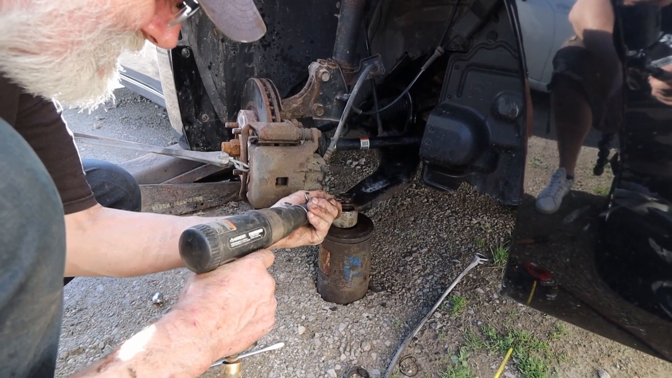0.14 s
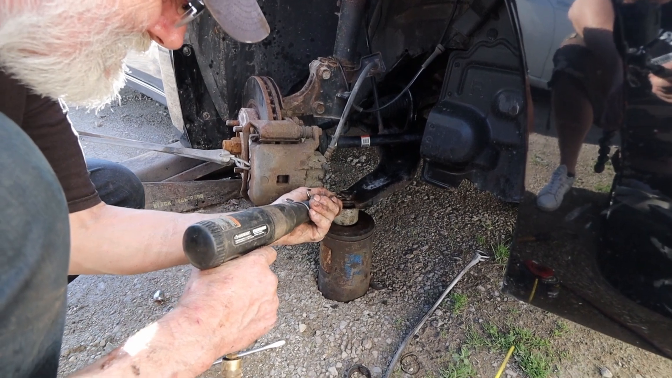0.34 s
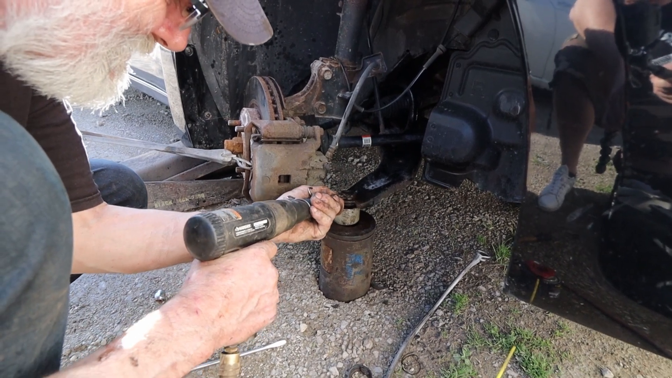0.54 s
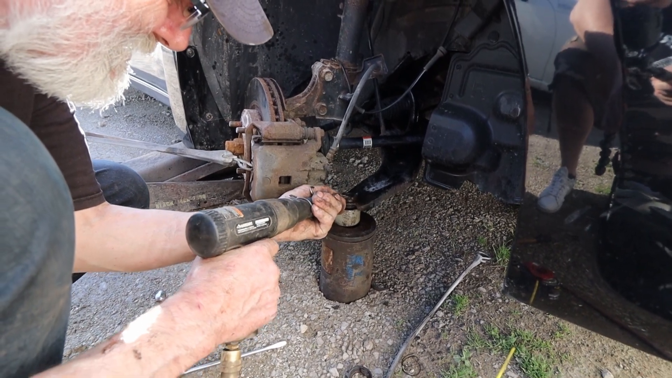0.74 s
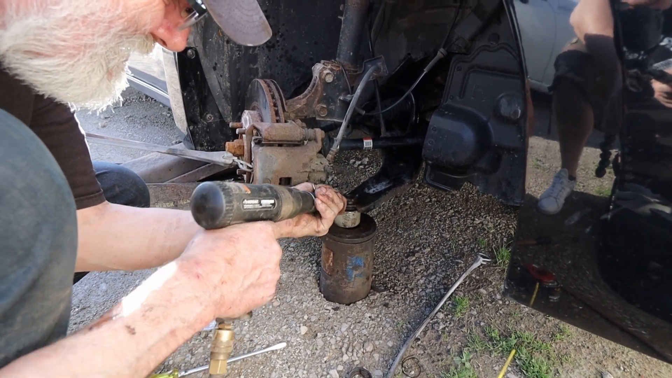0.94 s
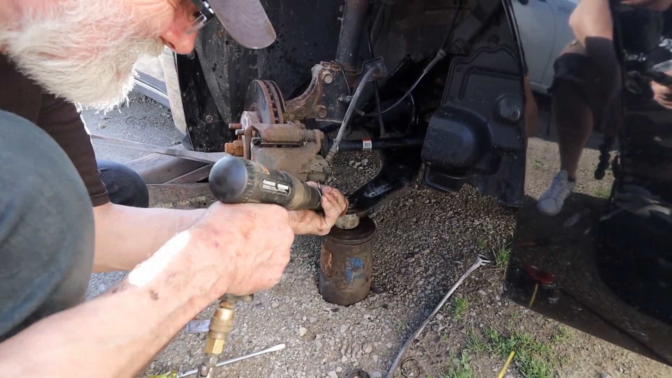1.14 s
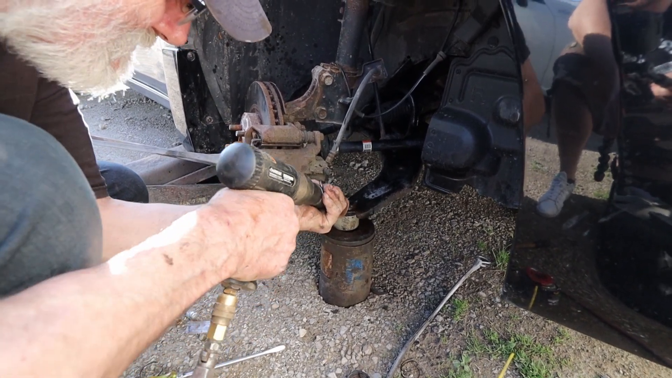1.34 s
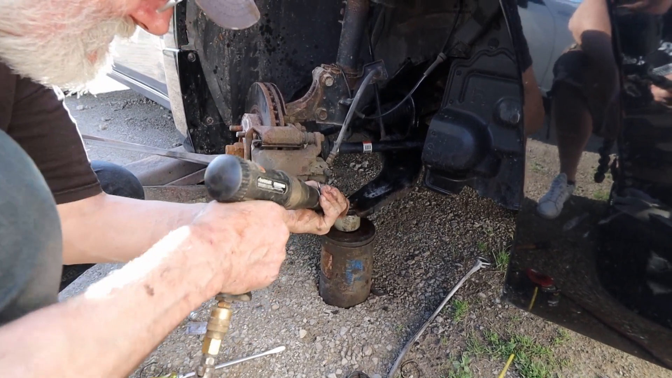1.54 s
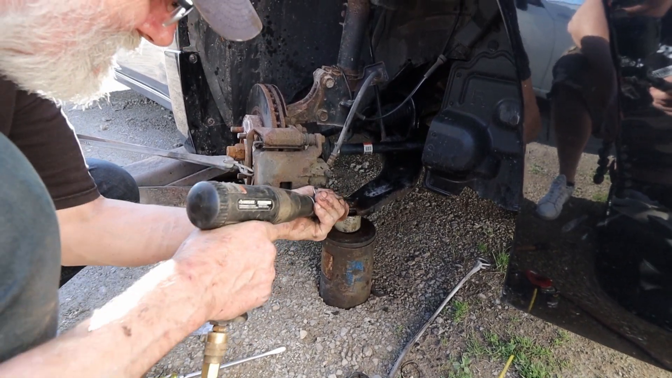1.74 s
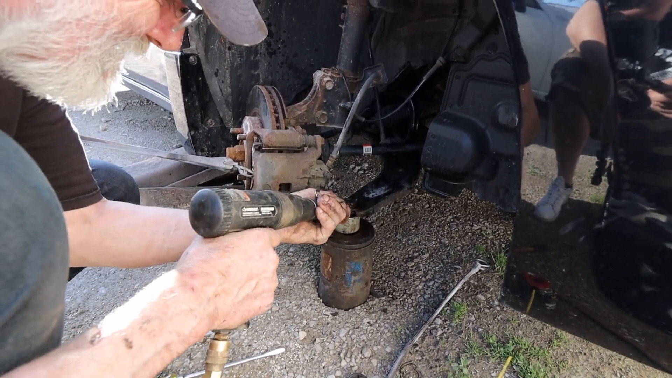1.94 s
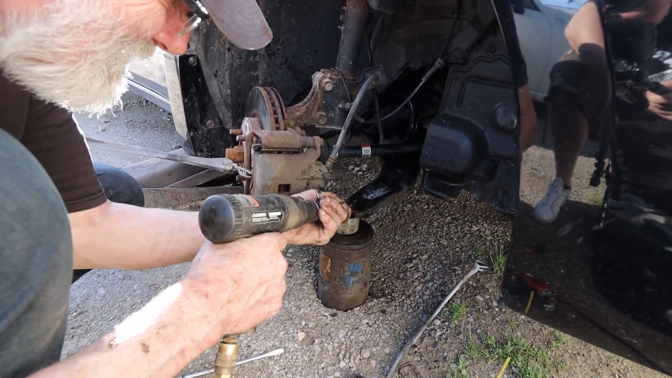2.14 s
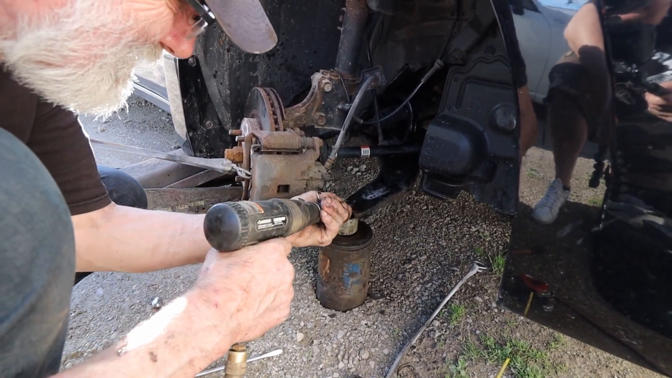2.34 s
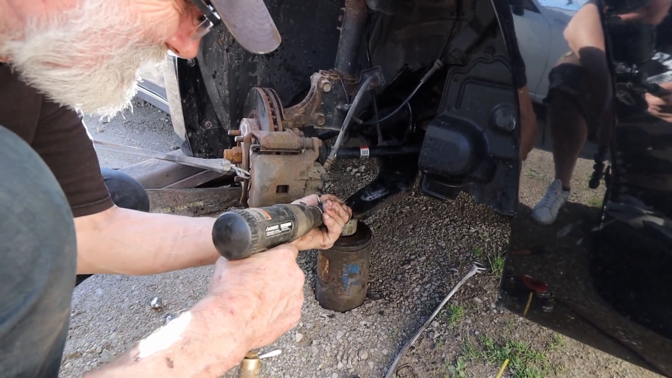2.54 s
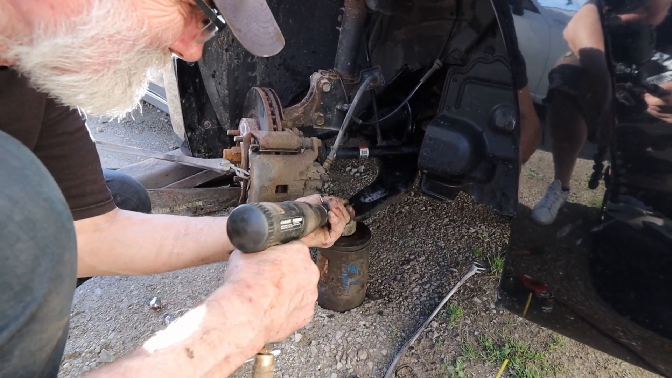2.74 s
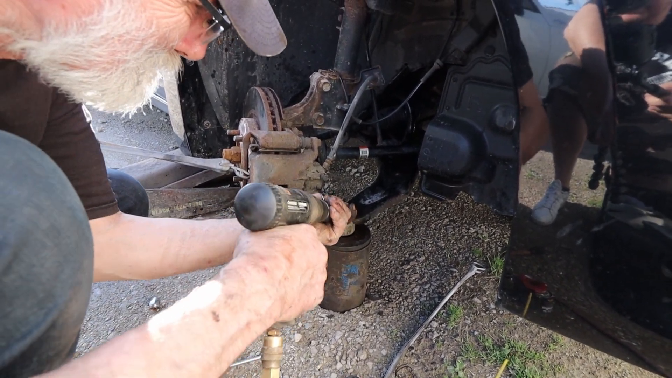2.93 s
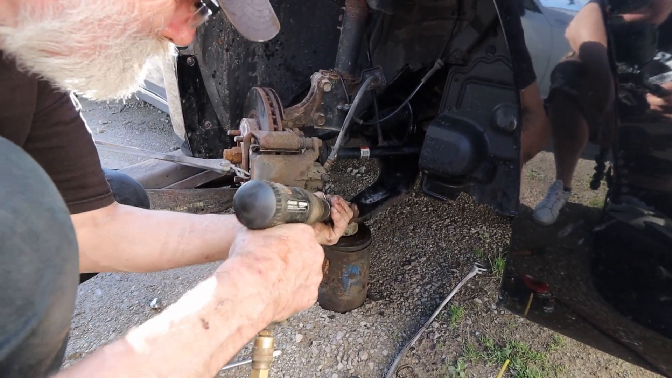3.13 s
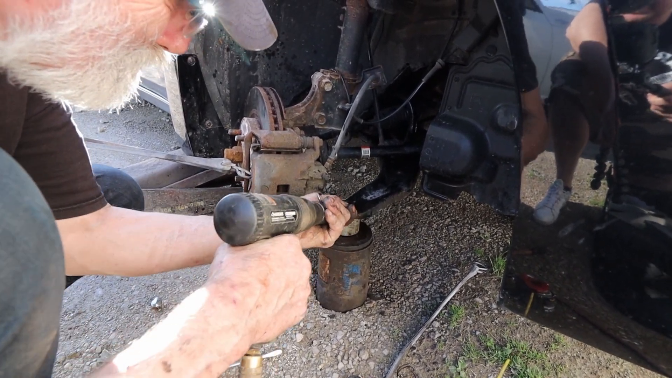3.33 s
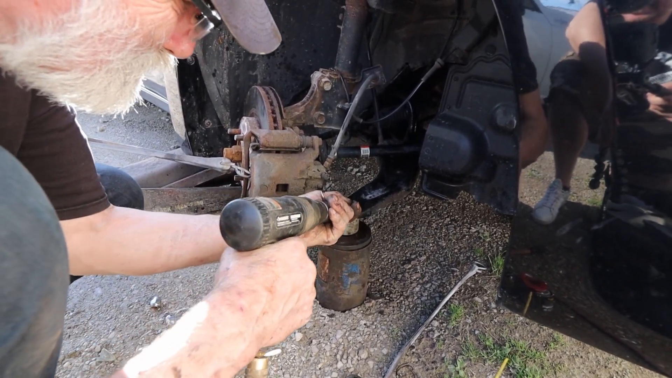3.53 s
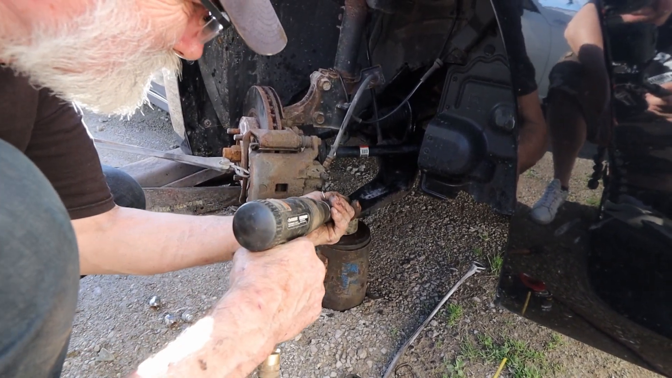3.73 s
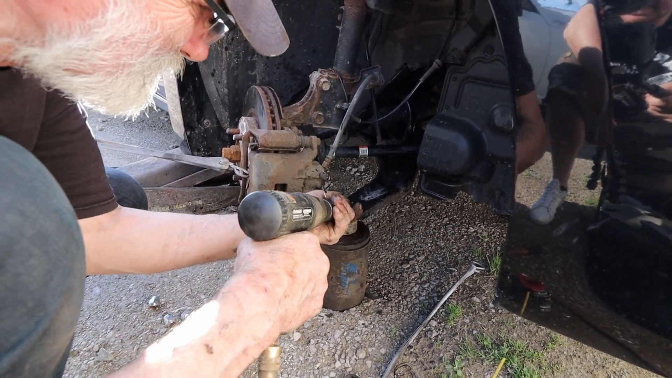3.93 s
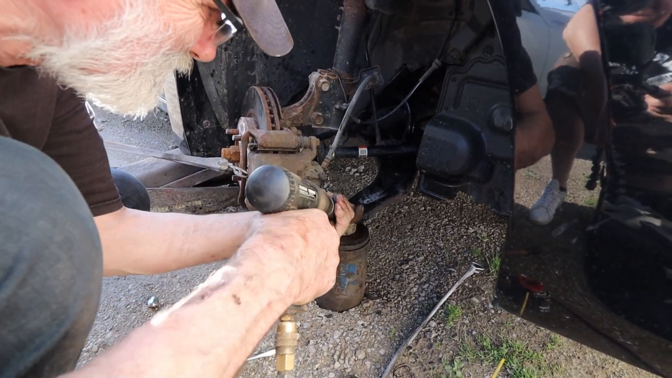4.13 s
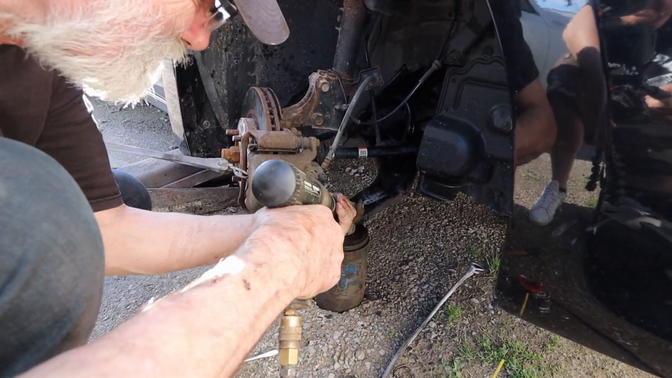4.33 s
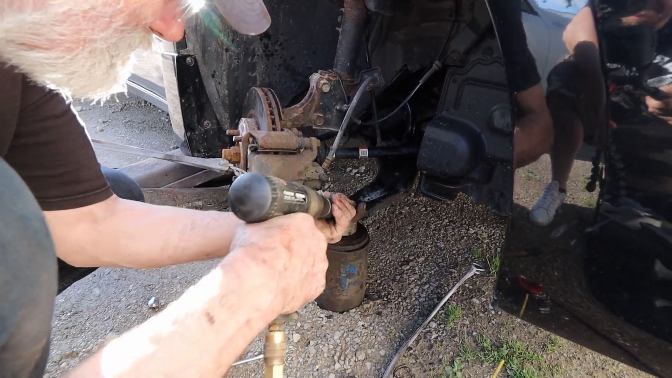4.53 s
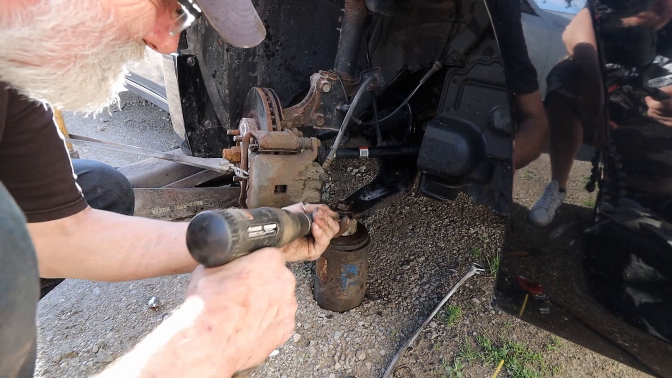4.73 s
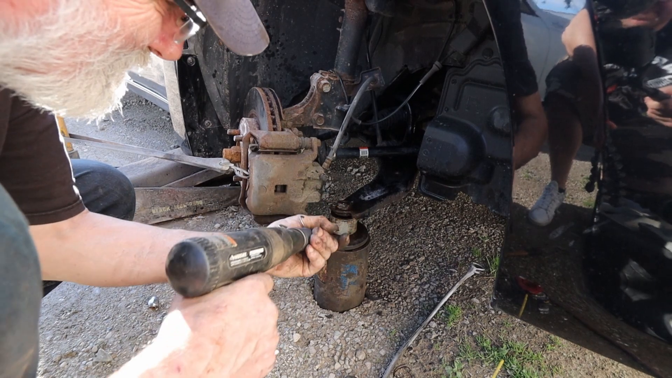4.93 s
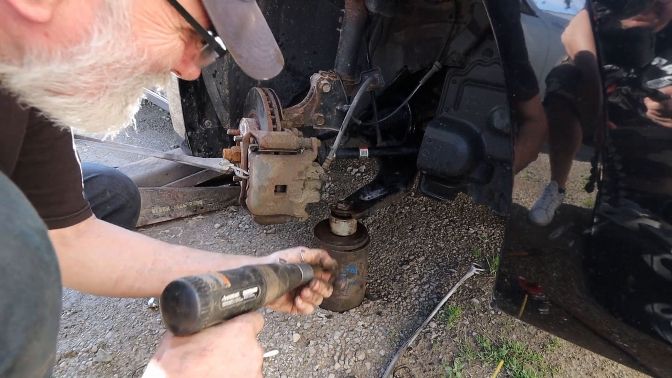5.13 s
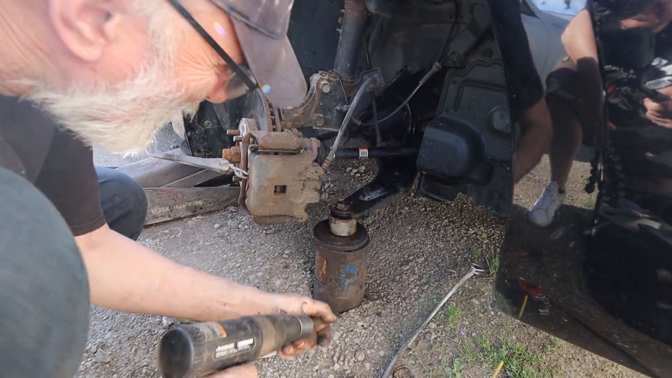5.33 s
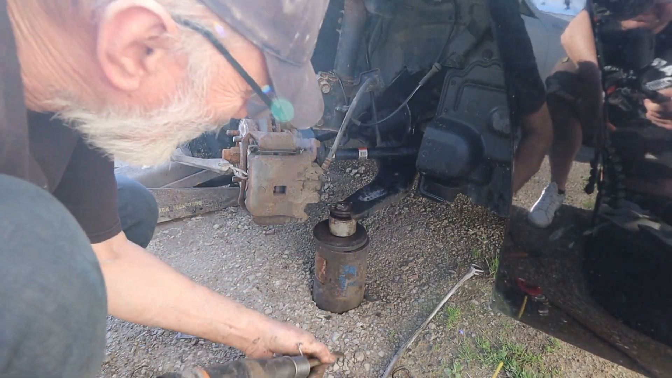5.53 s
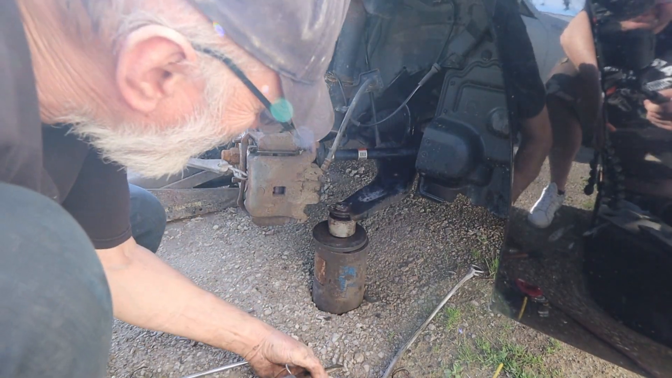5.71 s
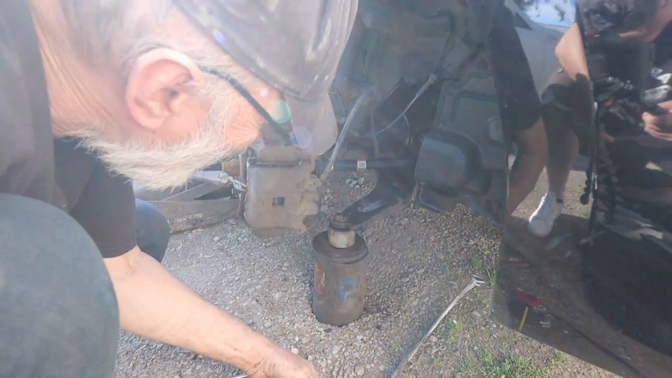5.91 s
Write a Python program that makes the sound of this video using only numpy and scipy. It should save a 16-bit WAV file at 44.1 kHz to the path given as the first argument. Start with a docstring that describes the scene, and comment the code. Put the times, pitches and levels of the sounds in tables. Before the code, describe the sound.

Outdoors and close up, an air chisel's bit knocks a few times against a car's steering knuckle. Air spurts from the trigger and the tool hammers in three short, loud bursts, each a fast metallic rattle with hissing exhaust. The steel rings briefly after each burst, with faint knocks between. Finally the tool is laid on gravel and briefly dragged.

```python
"""Outdoors, close up: an air chisel's bit knocks as it is set on a car's steering knuckle.
The trigger valve spurts and the chisel hammers in three short bursts, near 1.3, 3.0 and 4.3 s.
Each piston stroke rings the steel, rattles the wheel well and vents a thump and a hiss of air;
the loudest blows overload. The bit rings on as it lifts off and knocks between bursts.
From 5.7 s the tool is laid on gravel and briefly dragged."""
import sys
import numpy as np
from scipy import signal
from scipy.fft import rfft, irfft
from scipy.io import wavfile
from scipy.ndimage import uniform_filter1d

SR = 44100
rng = np.random.default_rng(int(sys.argv[2]) if len(sys.argv) > 2 else 0)


def materialize(psi):
    """Save the field psi as 16-bit PCM at rate SR to the path in sys.argv[1].

    A 1-D psi becomes a single channel; in a 2-D psi each row is a channel.
    """
    bounded = np.clip(np.atleast_2d(psi).T, -1, 1)
    quanta = np.round(bounded * 32767).astype(np.int16)
    wavfile.write(sys.argv[1], SR, quanta)


N = 267669
T = np.arange(N) / SR
AGE_S = T[:32768]  # time since a hit
BLOW_HZ = 42.4

# knuckle and brake disc modes: pitch_hz, level_db, t60_s
KNUCKLE_MODES = [(663, -11, 0.096), (777, -8, 0.32), (942, -6.5, 0.16), (1148, -4.5, 0.15),
                 (1170, -6.5, 0.49), (1300, -7, 0.36), (1352.5, -4.5, 0.24), (1537.7, -5, 0.15),
                 (1752, -9.5, 0.13), (1769, -4, 0.28), (2000, -6, 0.064), (2152, -15, 0.41),
                 (2229, -3, 0.081), (2394, -8, 0.13), (2466, -6.5, 0.38), (2730, 1, 0.24),
                 (2843, -10, 0.12), (3168, -3, .16), (3344, -2.5, 0.21), (3936, 2.5, 0.082),
                 (4160, -11, 0.15), (4036, -10, 0.33), (4390, -4, 0.11), (4614, -5.5, 0.18),
                 (4770, -5.5, 0.21), (5010, -5, 0.1), (5230, -11.5, 0.04), (5675, -3.5, 0.035),
                 (6150, -5, 0.042), (6340, -12, 0.26)]
# hollow modes of the wheel well: pitch_hz, level_db, t60_s
WELL_MODES = [(272, -3, 0.37), (308, -4.5, 0.39), (713, -4.5, 0.3)]


def undb(db):
    """Decibels to gain."""
    return 10 ** (np.asarray(db) / 20)


def add(out, start_s, sound):
    """Mix a sound in at start_s."""
    i = int(start_s * SR)
    out[i:i + len(sound)] += sound[:N - i]


def noise(spectrum, size, tilt_db_oct=0, peaks=1):
    """Noise of rms 1 from (freq_hz, level_db) points, tilted and shaped by resonance peaks."""
    octave = np.log2(np.maximum(np.arange(size // 2 + 1) * SR / size, 1))
    hz, db = np.transpose(spectrum)
    shape_db = np.interp(octave, np.log2(hz), db) + tilt_db_oct * np.maximum(octave, np.log2(hz[0]))
    gain = undb(shape_db) * (octave > np.log2(20))
    x = irfft(rfft(rng.standard_normal(size)) * gain * peaks, size)
    return x / x.std()


def unit(x):
    """Scale to rms 1 over the first piston cycle."""
    return x / np.sqrt(np.mean(x[:int(SR / BLOW_HZ)] ** 2))


def fade(rise_s, t60_s):
    """Exponential rise and decay."""
    return (1 - np.exp(-AGE_S / rise_s)) * np.exp(-np.log(1000) * AGE_S / t60_s)


def ring(spectrum, rise_s, t60_s, tilt_db_oct=0, peaks=1):
    """Dense modes and reflections set off at once: decaying coloured noise."""
    return unit(noise(spectrum, len(AGE_S), tilt_db_oct, peaks) * fade(rise_s, t60_s))


def blend(repeating, fresh, share):
    """Mix in a share of fresh sound at constant power."""
    return np.sqrt(1 - share) * repeating + np.sqrt(share) * fresh


def resonance(modes, width_hz, boost_db):
    """Gain spectrum of modes broadened by hand grip and bit pressure."""
    hz, db, _ = np.transpose(modes)
    bins_hz = np.arange(len(AGE_S) // 2 + 1) * SR / len(AGE_S)
    detuning = (bins_hz - hz[:, None]) / width_hz
    return np.sqrt(1 + undb(db + boost_db) ** 2 @ (1 + detuning ** 2) ** -2)


def partials(modes):
    """One decaying sine per mode, at random phase."""
    return np.array([undb(db) * np.sin(2 * np.pi * (hz * AGE_S + rng.random())) * fade(.001, t60_s)
                     for hz, db, t60_s in modes])


def strike(sines, spread_db, colour_db=0):
    """The contact point shifts, so each hit weights the modes anew."""
    return unit(undb(colour_db + spread_db * rng.standard_normal(len(sines))) @ sines)


def outdoor_air():
    """A soft, wavering rush that drops at the first burst."""
    # rush spectrum: freq_hz, level_db
    spectrum = [(25, -10), (85, 2), (250, -5.5), (500, -12), (1000, -8), (2000, -19.5), (3100, -26),
                (4600, -30), (6300, -37.5), (10500, -41.5), (15700, -48)]
    # rush envelope: time_s, level_db
    envelope = [(0, -41.5), (1.2, -37), (1.3, -57.5), (1.95, -61.5), (2.85, -58), (5.4, -54.5),
                (6.07, -48.5)]
    steps_s = np.arange(0, T[-1] + 1, .1)
    waver_db = .51 * np.interp(T, steps_s, rng.standard_normal(len(steps_s)))
    return noise(spectrum, N) * undb(np.interp(T, *np.transpose(envelope)) + waver_db)


def reflections(x):
    """Weak, dull echoes off the ground and things further away."""
    spectrum = [(100, -1.5), (300, 6), (1200, -.5), (5000, -10), (15000, -23)]  # freq_hz, level_db
    tail = noise(spectrum, len(AGE_S)) * fade(rise_s=.0025, t60_s=.5)
    return undb(-25) * signal.fftconvolve(x, tail / np.linalg.norm(tail))[:N]


def gravel_drag(start_s=5.94, rise_s=.13, level_db=-47):
    """Stones give way under the tool as it drags ever harder, a few much louder than the rest."""
    # grit spectrum: freq_hz, level_db
    spectrum = [(200, -5), (900, -10.5), (1600, -4.5), (1840, 10), (2100, 0), (3500, 2), (5000, -12),
                (8500, -14), (15000, -31)]
    stones_db = 3.5 * np.repeat(rng.exponential(size=N // 64 + 1), 64)[:N]
    crunch = uniform_filter1d(undb(stones_db), size=32)
    ramp = np.clip((T - start_s) / rise_s, 0, 1)
    return undb(level_db) * ramp * crunch / crunch.std() * noise(spectrum, N)


def knocks():
    """Bit and tool touch the work and the ground: a noisy knock plus a steel clink."""
    # contacts: start_s, level_db, tilt_db_oct, t60_s, clink_db, note_hz
    contacts = [(.434, -31, -3, 0.17, -2.5, 1770), (0.776, -40.5, -6.5, 0.1, -7.5, 2770),
                (0.914, -27, 2, 0.092, -0.5, 3188), (1.165, -30.5, -2.5, .17, -10.5, 2450),
                (1.186, -35.5, -5, 0.092, 1, 740), (1.839, -59, -5, 0.16, -5, 2770),
                (2.218, -57.5, -6.5, .18, -12, 1295), (3.703, -54.5, -6.5, .15, -4, 2625),
                (3.828, -61.5, -9.5, 0.092, -9, 2760), (4.158, -42, -1, .13, -6.5, 3350),
                (5.701, -48, 3.5, 0.094, -24.5, 970), (6.005, -46, 3.5, 0.13, -9, 1820)]
    # knock spectrum: freq_hz, level_db
    spectrum = [(100, -16), (270, -3.5), (500, -7.5), (900, -1), (1400, 2.5), (2400, -5), (3900, -5.5),
                (5000, -16.5), (8500, -19), (12000, -32.5), (16000, -47)]
    out = np.zeros(N)
    knuckle, well = partials(KNUCKLE_MODES), partials(WELL_MODES)
    peaks = resonance(KNUCKLE_MODES, width_hz=23, boost_db=9.5)
    # a soft touch excites few high modes
    soft_db = np.interp(np.array(KNUCKLE_MODES)[:, 0], *np.transpose(spectrum))
    for start_s, level_db, tilt_db_oct, t60_s, clink_db, note_hz in contacts:
        clink = strike(knuckle, spread_db=6, colour_db=soft_db) * np.exp(-AGE_S / t60_s)
        note = unit(partials([(note_hz, 0, t60_s)])[0])  # favoured by this contact point
        metal = undb(-.5) * clink + undb(-5.5) * note + undb(-7) * strike(well, spread_db=2)
        knock = ring(spectrum, .00081, t60_s, tilt_db_oct, peaks)
        add(out, start_s, undb(level_db) * (knock + undb(clink_db) * metal))
    return out


def trigger_valve():
    """Air spurts through the valve before and after each burst."""
    # air spurts: start_s, level_db, rise_s, t60_s
    spurts = [(1.208, -24.5, 0.015, 0.091), (1.219, -9.5, 0.0015, 0.14), (1.644, -43, .002, 0.084),
              (2.909, -28.5, 0.0086, 0.36), (3.349, -44, 0.00091, 0.094), (4.218, -29, .009, .12),
              (4.672, -40, 0.00084, .08)]
    # spurt spectrum: freq_hz, level_db
    spectrum = [(100, -7), (300, 0), (1000, -10), (3000, -4.5), (6000, -2), (8500, 1.5), (11000, -6),
                (15500, -4)]
    out = np.zeros(N)
    for start_s, level_db, rise_s, t60_s in spurts:
        add(out, start_s, undb(level_db) * ring(spectrum, rise_s, t60_s))
    return out


def bit_lift_off():
    """Bit and knuckle ring freely as they part after a burst."""
    # free modes: pitch_hz, level_db, t60_s
    modes = [(1170, 0, .3), (1771, -5, .22), (2772, -15, .45), (3955, -12, .5), (5181, -6, .48),
             (6988, -19, .25), (10160, -26, .3), (14125, -22, .35)]
    # lift-offs: start_s, level_db
    lifts = [(1.597, -40.5), (3.238, -29.5), (4.61, -34)]
    out = np.zeros(N)
    bit = partials(modes)
    for start_s, level_db in lifts:
        add(out, start_s, undb(level_db) * strike(bit, spread_db=2.5))
    return out


def piston_strokes(jitter_s=.00025, scatter_db=1.2):
    """Kick, hard blows that settle, run-down. Rows: start_s, blow_db, hiss_db, thump_db."""
    # hammering bursts: first_s, last_s, level_db, kick_db
    bursts = [(1.259, 1.565, -1, -12.5), (2.953, 3.235, -0.5, -19), (4.263, 4.572, 0, -17.5)]
    # late strokes as the piston runs down: start_s, drive_db
    run_down = [(1.596, -1.5), (1.636, -27), (3.284, -15.5), (3.319, -28), (4.592, -9), (4.612, -5),
                (4.639, -15)]
    # triples: blow, hiss, thump
    steady_db = np.array([-16, -22.5, -32])
    db_per_drive_db = np.array([1, 1.25, .22])  # hiss dies first, thump lasts
    surge_db, settle_s = np.array([6.5, 6, 7]), np.array([.052, .045, .035])
    kick_lead_s, kick_balance_db = .0247, np.array([0, -.6, -1])
    release_db, release_s = 3, .02  # drive lost as the trigger is let go
    rows = [(start_s, *(steady_db + db_per_drive_db * drive_db)) for start_s, drive_db in run_down]
    for first_s, last_s, level_db, kick_db in bursts:
        rows.append((first_s - kick_lead_s, *(kick_db + kick_balance_db)))
        count = int(round((last_s - first_s) * BLOW_HZ)) + 1
        for start_s in np.linspace(first_s, last_s, count):
            extra_db = surge_db * np.exp((first_s - start_s) / settle_s)
            lost_db = release_db * np.exp((start_s - last_s) / release_s)
            drive_db = scatter_db * rng.standard_normal() - lost_db
            levels_db = level_db + steady_db + extra_db + db_per_drive_db * drive_db
            rows.append((start_s + jitter_s * rng.standard_normal(), *levels_db))
    return rows


def air_chisel():
    """Each stroke rings knuckle, barrel and wheel well, and vents the cylinder."""
    # piston and barrel modes: pitch_hz, level_db, t60_s
    barrel_modes = [(6988, -10, .17), (7458, -1, .12), (7635, 0, .1), (7780, -4, .08), (8600, -4, .1),
                    (10347, -5, .1), (12478, -10, .08), (13124, -6, .09), (13571, -6, .09),
                    (14125, -4, .16), (15330, -9, .06)]
    # wheel well rattle: freq_hz, level_db
    rattle_spectrum = [(150, -41), (300, -19), (600, -6), (850, -13), (1150, -1), (2000, -0.5),
                       (3000, -4.5), (3600, -0.5), (4500, -3.5), (6000, -1), (7000, -3.5), (10000, -19),
                       (16000, -27)]
    # exhaust hiss: freq_hz, level_db
    hiss_spectrum = [(1000, -23), (3000, -8.5), (6000, -14), (8500, 6), (10000, 0), (11500, -7),
                     (13000, 1.5), (15500, -1)]
    # exhaust thump: freq_hz, level_db
    thump_spectrum = [(30, -37), (55, -26), (90, -14), (150, -7.5), (210, -1), (350, 0), (520, -0.5),
                      (900, -6.5), (2000, -35.5)]
    out = np.zeros(N)
    knuckle, barrel, well = partials(KNUCKLE_MODES), partials(barrel_modes), partials(WELL_MODES)
    rattle_shape = dict(rise_s=.003, t60_s=.12, peaks=resonance(KNUCKLE_MODES, width_hz=60, boost_db=14))
    hiss_shape = dict(rise_s=.002, t60_s=.095, peaks=resonance(barrel_modes, width_hz=53, boost_db=2))
    port_lead_s = .0012  # the port opens before the piston lands
    # these repeat as a buzz; bit shift and turbulence add a fresh share per stroke
    same_rattle = ring(rattle_spectrum, **rattle_shape)
    same_thump = ring(thump_spectrum, rise_s=.0023, t60_s=.15)
    same_hiss = ring(hiss_spectrum, **hiss_shape)
    for start_s, blow_db, hiss_db, thump_db in piston_strokes():
        rattle = blend(same_rattle, ring(rattle_spectrum, **rattle_shape), share=.24)
        thump = blend(same_thump, ring(thump_spectrum, rise_s=.00058, t60_s=.15), share=.11)
        hiss = blend(same_hiss, ring(hiss_spectrum, **hiss_shape), share=.93)
        add(out, start_s, undb(blow_db - 6.5) * strike(knuckle, spread_db=6.5))
        add(out, start_s, undb(blow_db - .24) * rattle)
        add(out, start_s, undb(thump_db - 3) * thump)
        add(out, start_s, undb(thump_db - 13.5) * strike(well, spread_db=6))
        add(out, start_s, undb(hiss_db - 5) * strike(barrel, spread_db=5.5))
        add(out, start_s - port_lead_s, undb(hiss_db - 1.06) * hiss)
    return out


def scene():
    """The work, its reflections and the open air, in mono."""
    work = air_chisel() + bit_lift_off() + trigger_valve() + knocks() + gravel_drag()
    return (work + reflections(work) + outdoor_air())[None]


def record(dry):
    """Soft clipping near full scale, then a steep low-pass."""
    cutoff_hz = 15620
    clipped = dry / (1 + dry ** 6) ** (1 / 6)
    return signal.sosfilt(signal.ellip(10, .2, 70, cutoff_hz, fs=SR, output="sos"), clipped)


dry = scene()
out = record(dry)
materialize(out)
```